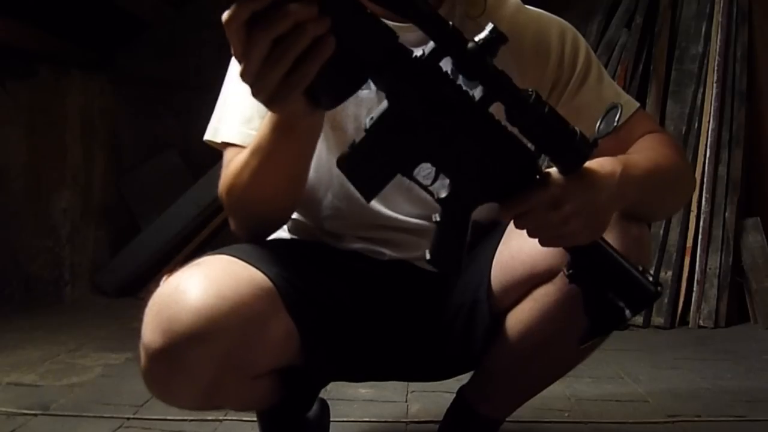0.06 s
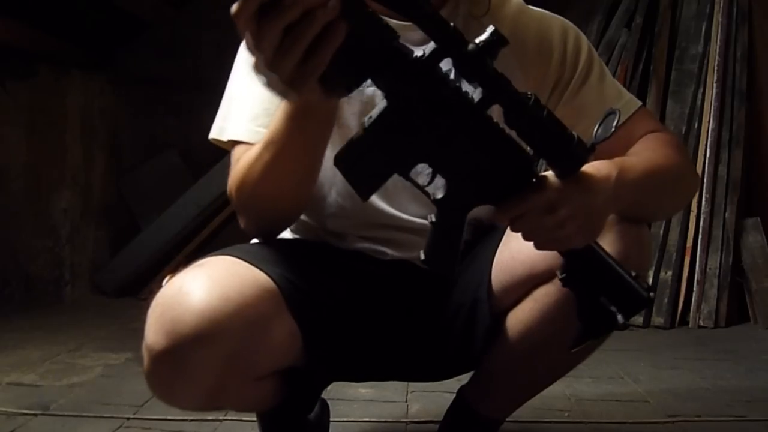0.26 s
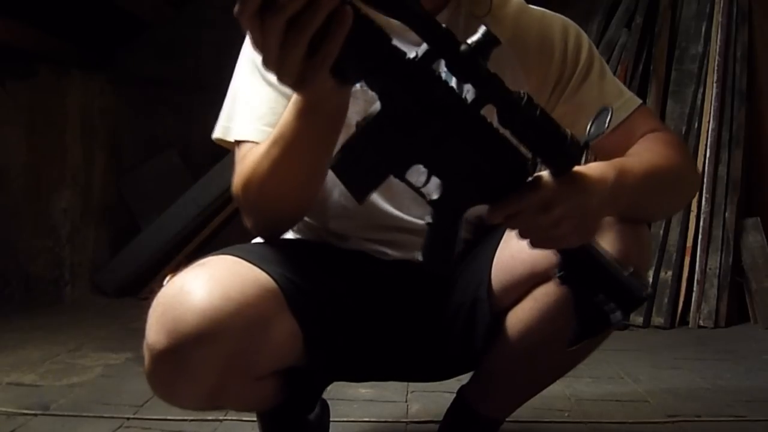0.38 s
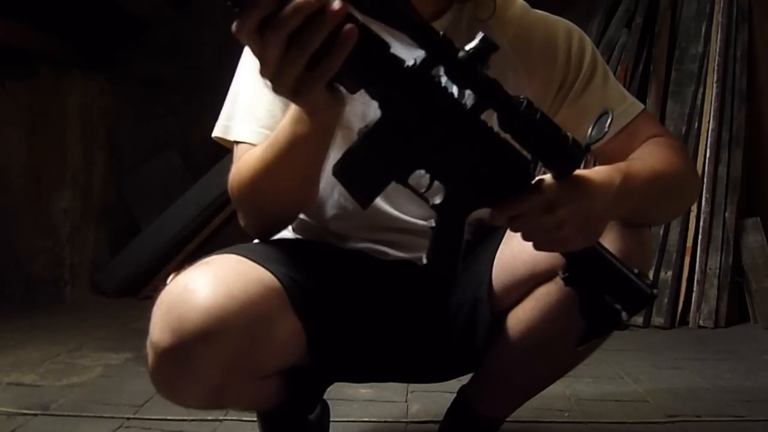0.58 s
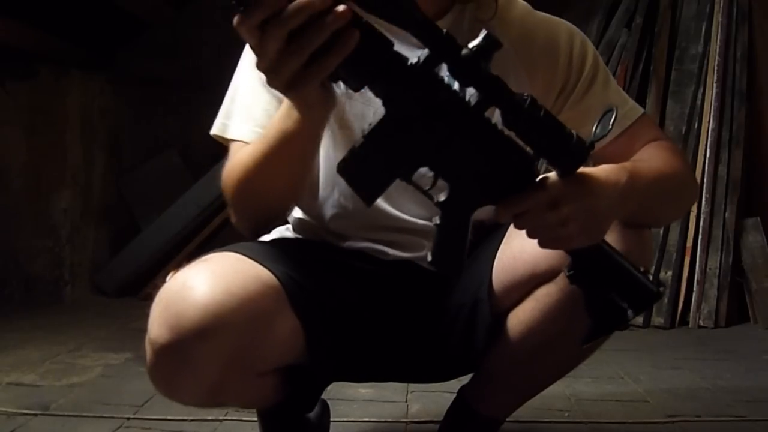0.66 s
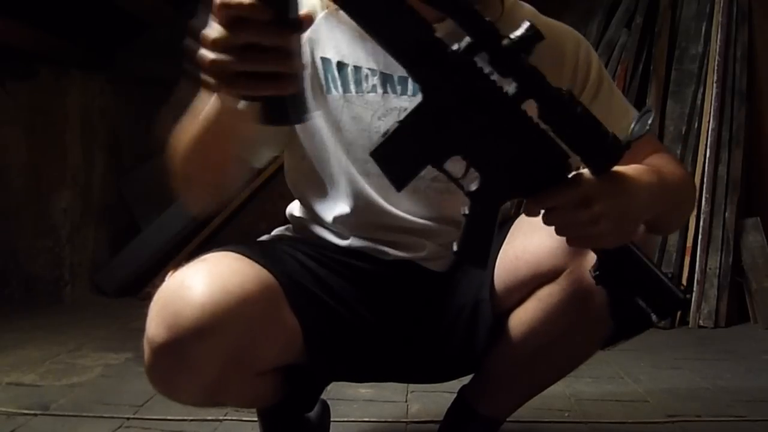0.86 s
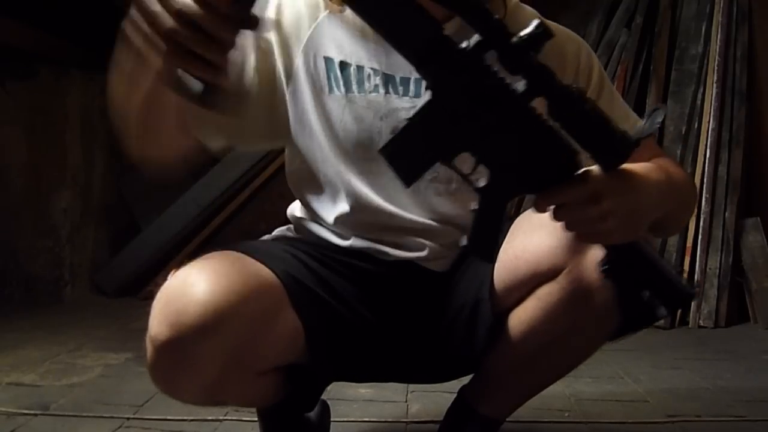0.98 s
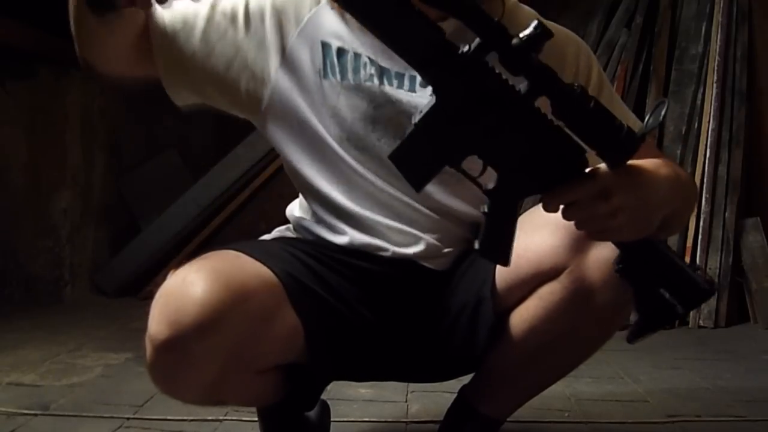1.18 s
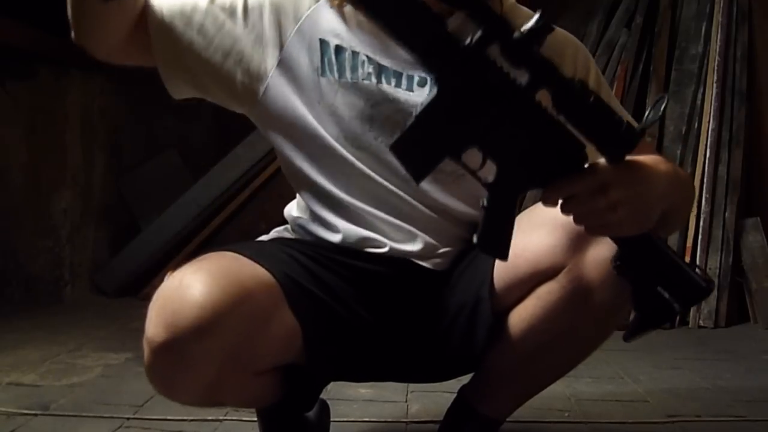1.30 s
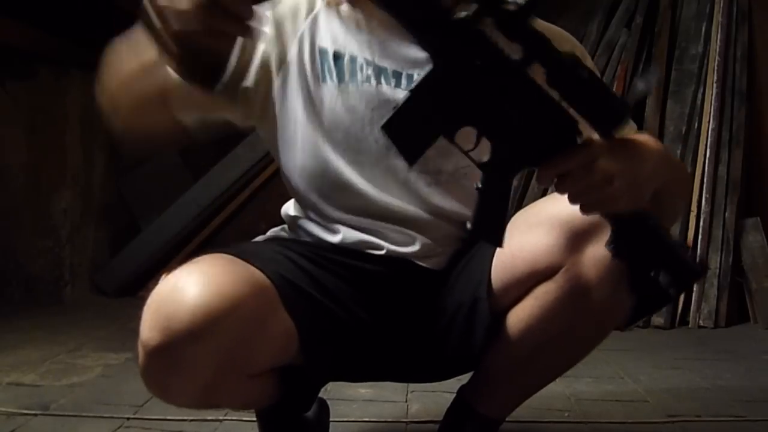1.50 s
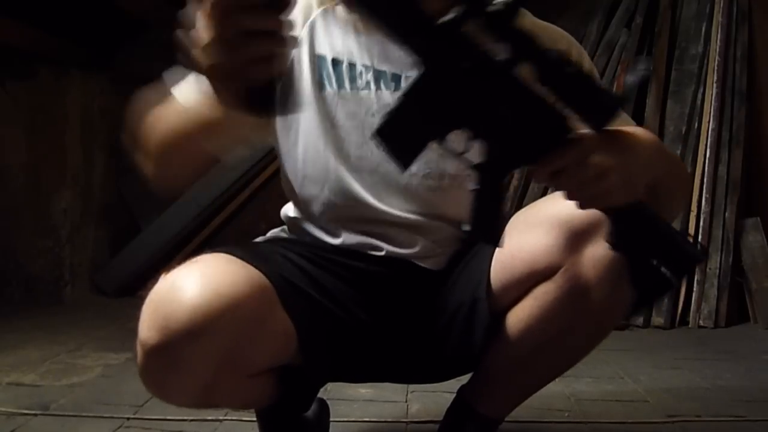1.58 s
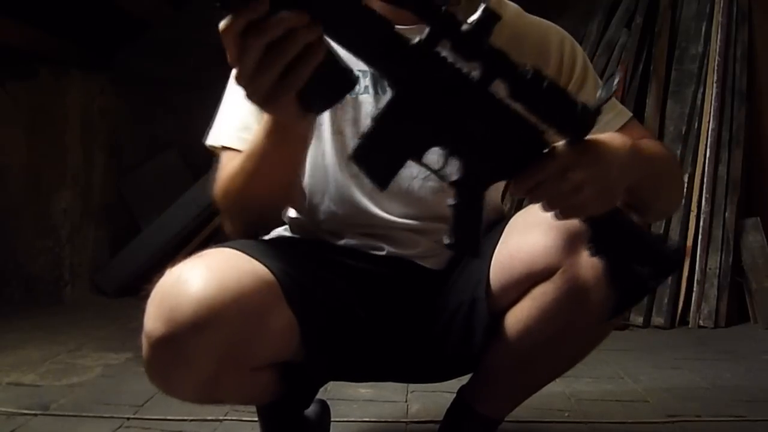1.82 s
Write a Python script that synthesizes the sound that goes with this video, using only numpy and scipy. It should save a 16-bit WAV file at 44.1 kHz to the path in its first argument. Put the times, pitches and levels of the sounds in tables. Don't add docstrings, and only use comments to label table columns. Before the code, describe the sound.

A rifle's pump lever unlatches loudly, scrapes and hisses open, clacks, then small clicks and rustle

```python
import sys
import numpy as np
from scipy import signal
from scipy.fft import rfft, irfft
from scipy.io import wavfile
from scipy.ndimage import uniform_filter1d

SR = 44100
rng = np.random.default_rng(int(sys.argv[2]) if len(sys.argv) > 2 else 0)


def boost(x):
    u = np.asarray(x, float) / 20
    return 10 ** u


def digitize_waveform(pressure):
    field = np.atleast_2d(pressure).T
    bounded = np.clip(field, -1, 1)
    quanta = np.round(bounded * 32767).astype(np.int16)
    wavfile.write(sys.argv[1], SR, quanta)


N = 81585
TIME = np.arange(N) / SR


def unit(x):
    return x / np.sqrt(np.mean(x ** 2) + 1e-30)


def band(x, hz, width_hz):
    return signal.lfilter(*signal.iirpeak(min(hz, .45 * SR), hz / max(width_hz, 1), fs=SR), x)


def body(x, modes, flip=-1):
    return sum(flip ** k * boost(db) * band(x, hz, width) for k, (hz, width, db) in enumerate(modes))


def sos_filter(x, order, hz, kind, run=signal.sosfilt):
    return run(signal.butter(order, hz, kind, fs=SR, output="sos"), x)


def slim_lever(x):
    return sos_filter(x, 4, 469, "high")


def curve(table, column):
    table = np.array(table)
    return np.interp(TIME, table[:, 0], table[:, column])


def walk(rate_hz):
    hold = int(SR / rate_hz)
    steps = np.repeat(rng.standard_normal(N // hold + 1), hold)
    return unit(uniform_filter1d(steps, hold)[:N])


def uneven(spread_db):
    return rng.standard_normal(N) * boost(spread_db * rng.exponential(size=N))


def gate(start_s, length_s, rise_s):
    t = np.maximum(TIME - start_s, 0)
    return (1 - np.exp(-t / rise_s)) * np.exp(-t / length_s)


def hump(start_s, length_s):
    return np.sin(np.pi * np.clip((TIME - start_s) / length_s, 0, 1)) ** .5


def tinted(tone, flicker_db, rate_hz):
    tone = np.array(tone)
    f = np.fft.rfftfreq(N, 1 / SR) + 1
    level = boost(np.interp(np.log(f), np.log(tone[:, 0]), tone[:, 1]))
    out = 0
    for hz in 25 * 2 ** (np.arange(18) / 2):
        shape = np.clip(1 - 2 * np.abs(np.log2(f / hz)), 0, 1) ** .5 * level
        noise = irfft(rfft(rng.standard_normal(N)) * shape, N)
        out = out + noise * boost(flicker_db * min(1, 1500 / hz) * walk(rate_hz))
    return unit(out)


def knock(blows, modes, direct_db):
    push = 0
    for k, (start_s, db, push_ms) in enumerate(blows):
        ms = max(push_ms, .08)
        phase = np.clip((TIME - start_s) / (ms / 1000), 0, 1)
        push = push - (-1) ** k * boost(db) * np.sin(np.pi * phase) / ms
    ring = slim_lever(body(push, modes) + boost(direct_db) * band(push, 2660, 4700))
    return ring / np.abs(ring).max() * boost(max(blow[1] for blow in blows))


# start_s, level_db, push_ms
LATCH_BLOWS = [
    (.2209, 6, 0.29),
    (.2214, -21, 1),
    (.2221, 6, 0.2),
    (.2225, 0.5, 0.11),
    (.2227, 2, 0.097),
    (.2236, -3, 0.5),
]
# mode_hz, width_hz, level_db
LATCH_MODES = [(610, 158, 8), (1054, 390, -1.5), (1530, 89, -8.5), (1760, 410, -13.5), (2610, 460, -0.5),
               (3450, 790, -8), (3700, 800, -3.5), (5000, 260, -13), (5550, 220, 8), (6250, 950, 1.5),
               (10500, 2000, -39), (13500, 720, -35)]


def latch():
    return knock(LATCH_BLOWS, LATCH_MODES, -9)


# start_s, level_db, push_ms
STOP_BLOWS = [
    (.6390, -18, .25),
    (.6398, -9, .3),
    (.6404, -9, .3),
    (.6412, -8, .3),
    (.644, -19, .25),
    (.646, -17, .2),
    (.6476, -18, .3),
    (.6496, -18, .2),
    (.6537, -17, .4),
    (.6838, -20, .6),
]
# mode_hz, width_hz, level_db
STOP_MODES = [(501, 67, -1.5), (675, 140, -1), (914, 360, 3.5), (1130, 240, 6), (1653, 140, 10.5),
              (2160, 950, 0), (2630, 250, 1), (2735, 160, 2), (3470, 250, 5), (4200, 400, 4),
              (5300, 390, -23.5), (5740, 240, -28), (6230, 430, -22), (7500, 690, -26)]


def stop():
    return knock(STOP_BLOWS, STOP_MODES, -33)


def rattle():
    length_s = .012
    shake = uneven(2.0) * gate(STOP_BLOWS[0][0] - .001, length_s, .002)
    wide_modes = [(hz, 2 * width, db) for hz, width, db in STOP_MODES]
    ring = unit(body(shake, wide_modes, flip=0.66)) + boost(-11.0) * unit(band(shake, 1850, 4500))
    return boost(-27) * ring * np.sqrt(length_s * SR / N)


# time_s, scrape_db, air_db
STROKE = [
    (.185, -50.5, -113),
    (.215, -29, -29),
    (.236, -29.5, -36.5),
    (.372, -28.5, -39.5),
    (.43, -36.5, -44.5),
    (.5, -43.5, -41.5),
    (.57, -52.5, -37.5),
    (.6, -60, -47),
    (.632, -37, -48),
]
# mode_hz, width_hz, level_db
TUBE_MODES = [(540.5, 73, 6), (783, 250, -0.5), (1060, 240, -4.5), (1184, 420, -4), (1770, 360, 1),
              (2154, 240, -8), (2600, 210, 0), (2764, 260, -4), (3250, 550, -7), (4000, 1600, -13),
              (4960, 180, -8.5), (5500, 730, -42), (7200, 400, -31)]
# mode_hz, width_hz, level_db
AIR_MODES = [(5970, 250, 0), (6300, 300, -17), (5380, 2230, 8.5), (7160, 4240, 6.5), (4080, 1100, -8)]


def stroke():
    moving = curve([(.17, 0), (.19, 1), (.62, 1), (.64, 0)], 1)
    slips_per_s, scatter_db = 6000, 2.0
    scrape, shared_db = 0, walk(202.4)
    for hz, width, db in TUBE_MODES:
        slips = (rng.random(N) < slips_per_s / SR) * uneven(scatter_db)
        scrape = scrape + boost(db + shared_db) * band(band(slips, hz, width), hz, 3 * width)
    scrape = unit(slim_lever(scrape)) * boost(curve(STROKE, 1))
    air = unit(body(rng.standard_normal(N), AIR_MODES)) * boost(walk(75.6))
    return moving * (scrape + air * boost(curve(STROKE, 2)))


def squeak():
    return boost(-24) * gate(.2105, .006, 0.00073) * np.sin(2 * np.pi * 5150 * TIME)


def stock_hum():
    return boost(-37) * hump(.652, .085) * np.sin(2 * np.pi * 156 * TIME + 0.41 * walk(569 / 3.6474358974))


def hinge():
    whisper = unit(band(rng.standard_normal(N), 2960, 90))
    return boost(-60.5 + 1.5 * walk(30.8)) * hump(.98, .24) * whisper


# start_s, level_db, pitch_hz, width_hz,
# length_ms
CLICKS = [(.121, -54, 705, 292, 120), (.1334, -41, 4700, 6000, 1.5), (.1362, -42, 4800, 4000, 2),
          (.1385, -43, 2300, 800, 1.9), (.202, -41, 1750, 1200, 7), (.64, -36, 2800, 500, 12),
          (.64, -39, 560, 200, 12), (.641, -34, 1670, 150, 14), (.642, -48, 250, 150, 20),
          (.655, -48, 360, 120, 30), (.6835, -35, 900, 400, 5), (.684, -38, 446, 200, 12),
          (.705, -43, 1250, 500, 45), (.761, -50, 5650, 4000, 7.5), (.772, -43, 1000, 600, 5),
          (.8155, -42, 3000, 1200, 22), (.816, -40, 900, 700, 5), (.817, -41, 460, 250, 10),
          (.82, -47, 6000, 3500, 9), (.985, -46, 1300, 1100, 10), (1.0, -49, 185, 50, 25),
          (1.035, -49, 210, 50, 25), (1.035, -50, 350, 60, 20), (1.07, -46, 215, 45, 25),
          (1.105, -51, 340, 70, 20), (1.105, -51, 205, 60, 20), (1.106, -46, 1900, 1720, 11),
          (1.15, -53, 280, 150, 30), (1.225, -50, 375, 50, 20), (1.31, -60, 1963, 1200, 62),
          (1.371, -61, 2900, 1480, 43), (1.389, -52, 700, 600, 14), (1.4302, -48, 2700, 1400, 5),
          (1.4312, -44, 1060, 508, 4), (1.465, -50, 1100, 400, 3), (1.4968, -43, 1080, 345, 6),
          (1.4968, -44, 1550, 400, 3), (1.497, -55, 2900, 1500, 20), (1.503, -52, 1620, 150, 25),
          (1.835, -51, 2500, 2000, 11)]


def clicks():
    out = 0
    for start_s, db, hz, width, ms in CLICKS:
        ticks = uneven(2.2)
        burst = (np.sign(ticks) + 0.24 * ticks) * gate(start_s, ms / 1000, 1 / 8000)
        ring = band(band(burst, hz, width), hz, 2 * width)
        out = out + boost(db) * unit(ring) * np.sqrt(ms / 1000 * SR / N)
    return boost(-0.44) * out


# time_s, level_db
SLEEVE_MOVES = [
    (0, -51),
    (.7, -50.5),
    (.9, -47.5),
    (1.12, -47.5),
    (1.25, -53.5),
    (1.36, -51),
    (1.5, -50),
    (1.62, -51.5),
    (1.85, -53.5),
]
# freq_hz, density_db_per_hz
SLEEVE_TONE = [(88, -36), (150, -5), (367, -8), (435, -9.5), (675, -6), (2980, -21.5), (7430, -28.5),
               (8500, -34), (11000, -85), (18700, -120)]


def sleeve():
    return tinted(SLEEVE_TONE, 1.6, 29.87) * boost(curve(SLEEVE_MOVES, 1))


def shed(x):
    t60_s, damp_hz, gap_s, wet_db = 0.41, 3440, 0.0012, -5
    t = np.arange(SR // 2) / SR
    noise = rng.standard_normal(len(t))
    low = signal.lfilter(*signal.butter(1, damp_hz, fs=SR), noise)
    high = (noise - low) * 1000 ** (-t / (0.25 * t60_s))
    tail = (low + high) * 1000 ** (-t / t60_s) * (t > gap_s)
    return signal.fftconvolve(x, boost(wet_db) * tail / np.sqrt(np.sum(tail ** 2)))[:N]


# time_s, pitch_hz, level_db
DRONE = [(0.0, 50.6, -59), (0.06, 51.5, -53.5), (0.226, 50.3, -45.5), (0.252, 51.8, -70),
         (0.592, 50.33, -52), (0.752, 54.6, -46.5), (0.792, 51.6, -56), (0.89, 55, -43), (0.978, 55, -70),
         (1.164, 55.5, -59), (1.19, 53.1, -67.5), (1.73, 54.13, -44.5), (1.834, 57.1, -49.5),
         (1.85, 51.6, -42)]


def drone():
    turn = 2 * np.pi * np.cumsum(curve(DRONE, 1)) / SR
    return np.sqrt(2) * boost(curve(DRONE, 2)) * (np.sin(turn) + boost(-19) * np.sin(2 * turn))


# freq_hz, density_db_per_hz
SHED_TONE = [(12, -58), (20, -21), (59, -7), (83, -12.5), (200, -14.5), (377, -15), (711, -27.5),
             (807, -26), (8500, -40), (11000, -76), (18700, -120)]


def shed_air():
    return boost(-50.5) * tinted(SHED_TONE, 1.2, 12.33)


def scene():
    snap, thud, shake, small, scrape = latch(), stop(), rattle(), clicks(), stroke()
    to_walls = boost(-15.0) * snap + boost(-9) * thud + boost(3.0) * shake + boost(-4.0) * small + boost(-7.5) * scrape
    rifle = snap + thud + shake + small + scrape + squeak() + stock_hum() + hinge()
    mono = rifle + shed(to_walls) + sleeve() + drone() + shed_air()
    return np.array([mono, mono])


def band_limit(x):
    return signal.sosfilt(signal.butter(12, 16100, fs=SR, output="sos"), x)


def record(dry):
    zero_phase = signal.sosfiltfilt
    dry = np.clip(dry, -.97, .86)
    cut = sos_filter(dry, 12, 8040, "low", zero_phase)

    effort = np.tanh(uniform_filter1d(np.abs(band(cut[0], 7800, 3000)), size=900, origin=100) / .003)
    hiss = effort * (rng.standard_normal(N) + boost(4) * rng.standard_normal((2, N)))
    leak = boost(-77.5) * sos_filter(hiss, 3, [8930, 15600], "band")

    loud = uniform_filter1d(1. * (np.abs(dry) > .55), size=30) > 0
    crack = boost(-0.5) * sos_filter(dry * loud, 6, [9500, 14500], "band", zero_phase)

    treble = sos_filter(cut[0], 8, 8030, "high", zero_phase)
    loud_side = band(band(np.roll(cut[0] * loud[0], 5), 6000, 2500), 5500, 4000)
    side = boost(-3) * treble * walk(900) + boost(-9) * np.roll(crack[0], 9) + boost(-23.5) * loud_side
    side = side * np.array([[1], [-1]])

    late_s = np.maximum(np.arange(N) - np.argmax(np.abs(dry[0])), 0) / SR
    swing_hz, swing_width_hz = 3.9, 5
    swing = np.sin(2 * np.pi * swing_hz * late_s) * np.exp(-late_s * np.pi * swing_width_hz)
    return band_limit(cut + leak + crack + side + .015 + boost(-23.5) * swing)


dry = scene()
out = record(dry)
digitize_waveform(out)
```